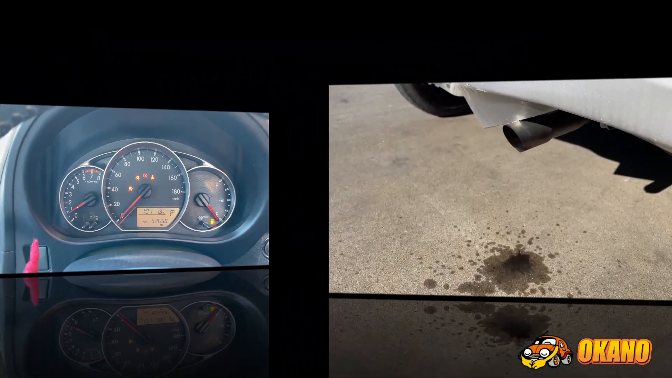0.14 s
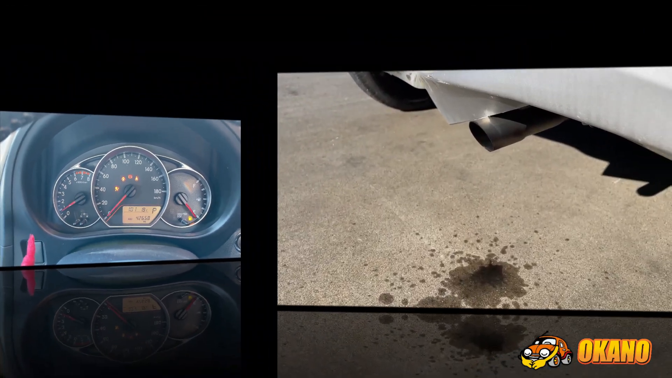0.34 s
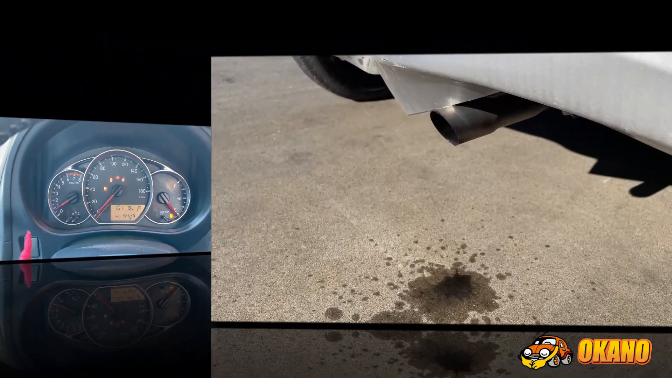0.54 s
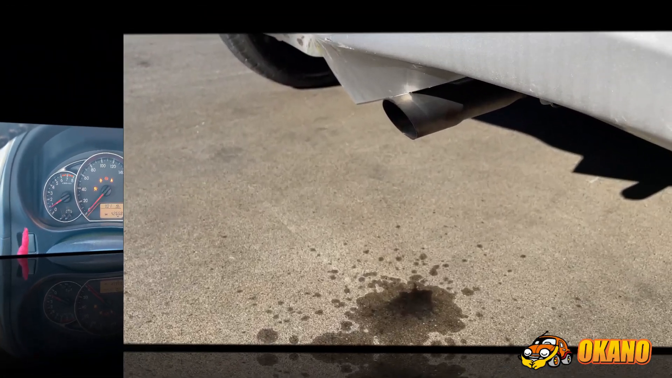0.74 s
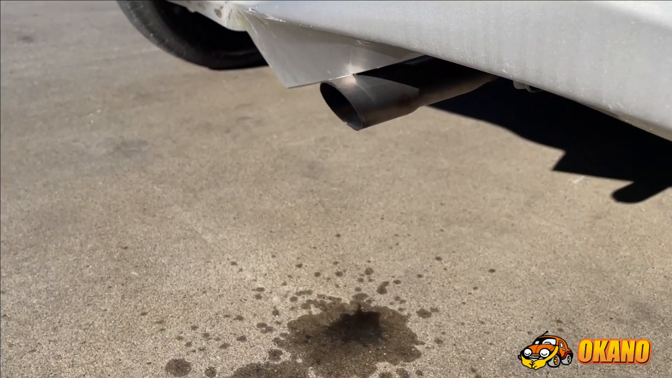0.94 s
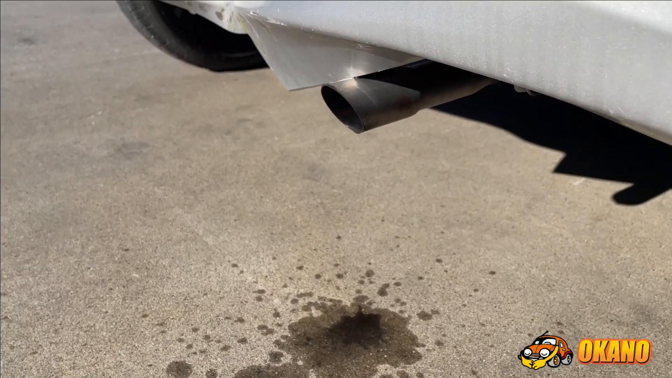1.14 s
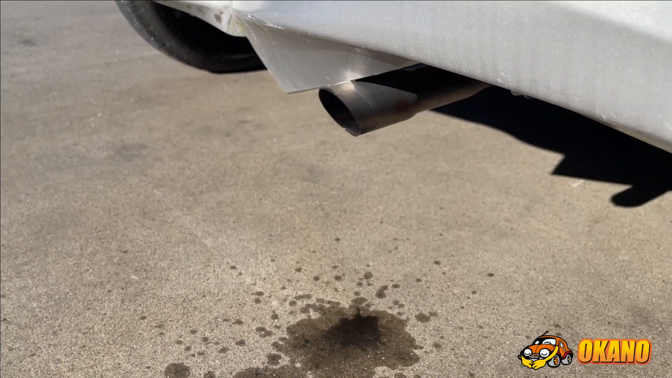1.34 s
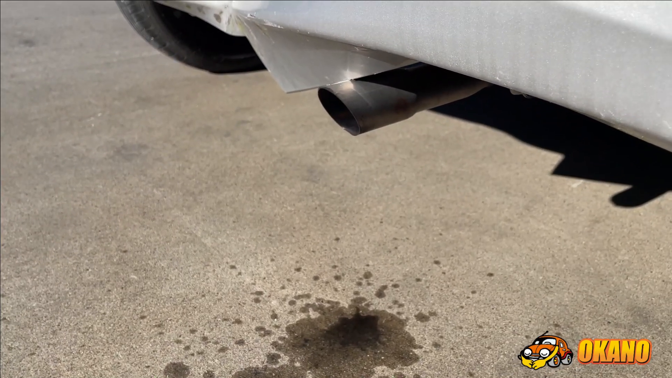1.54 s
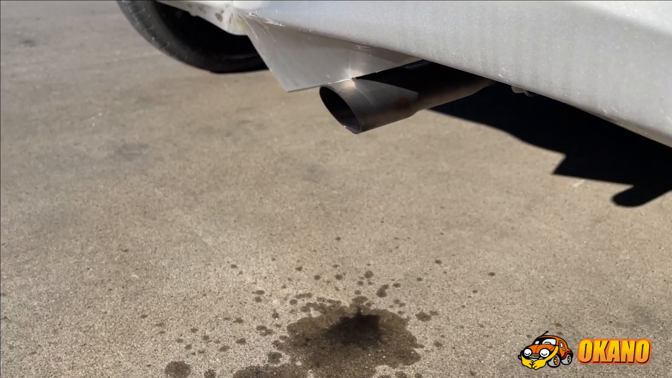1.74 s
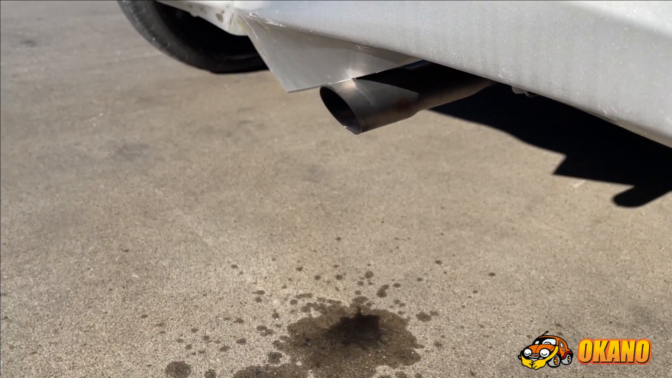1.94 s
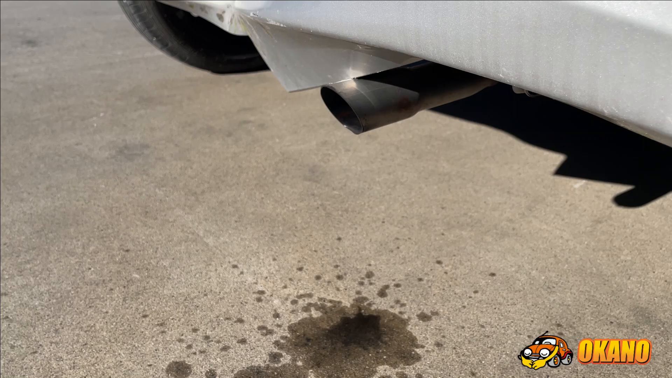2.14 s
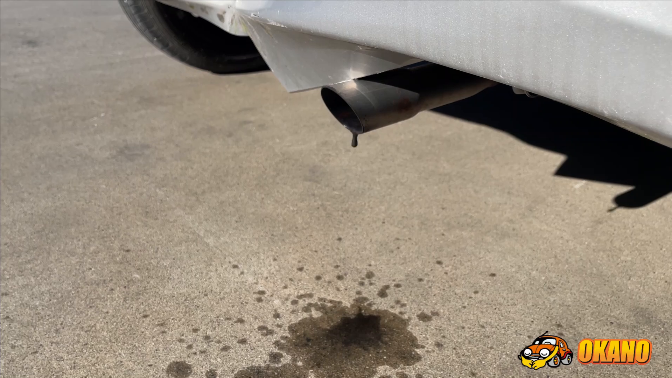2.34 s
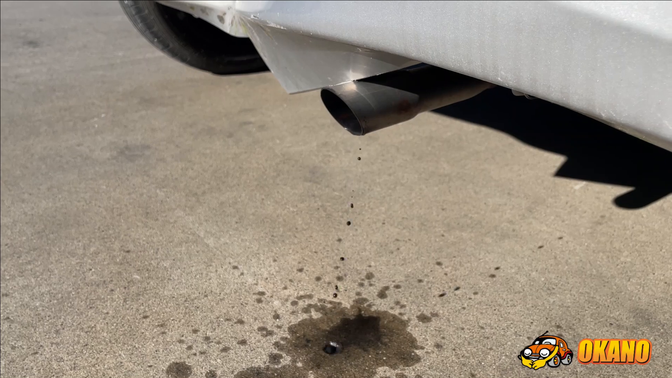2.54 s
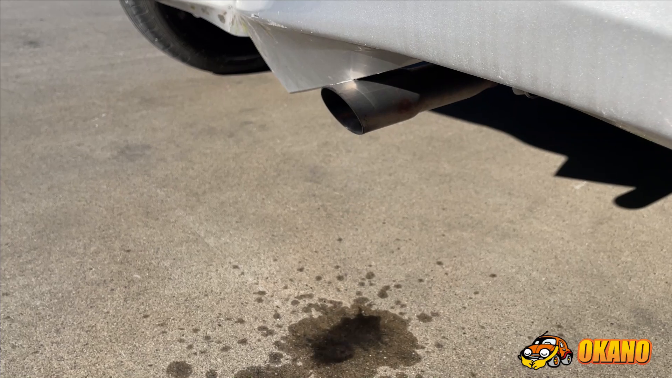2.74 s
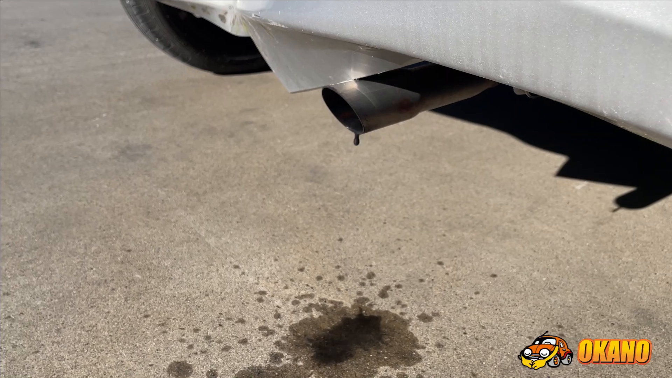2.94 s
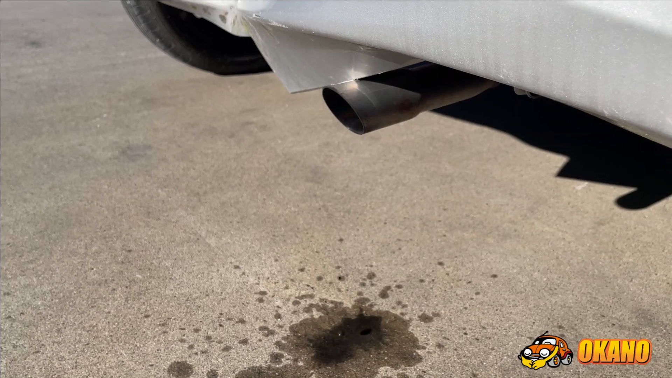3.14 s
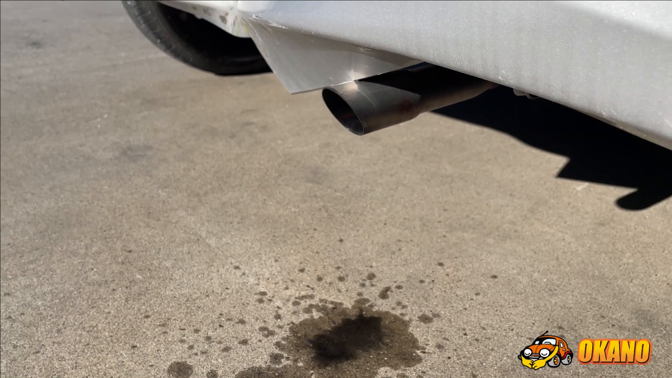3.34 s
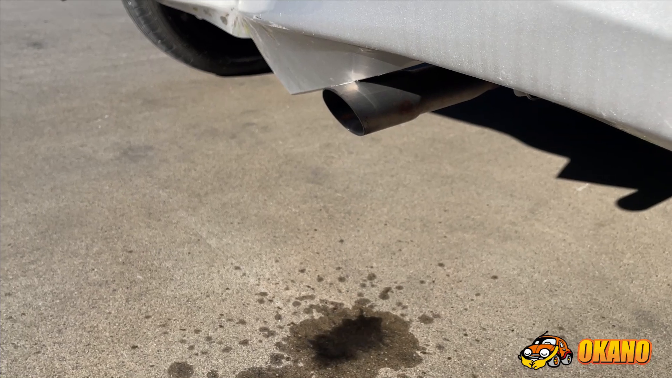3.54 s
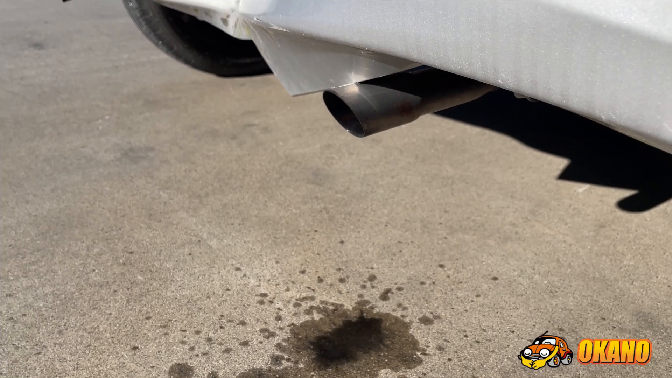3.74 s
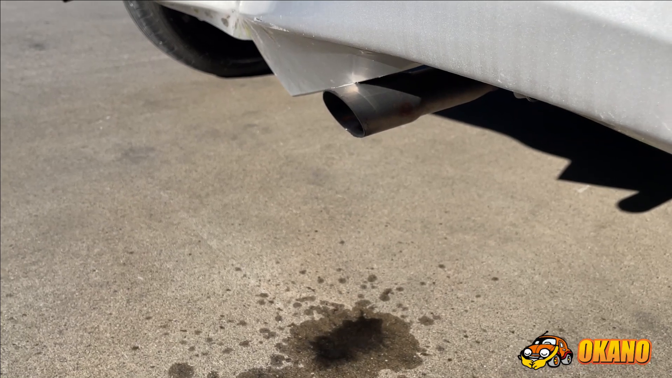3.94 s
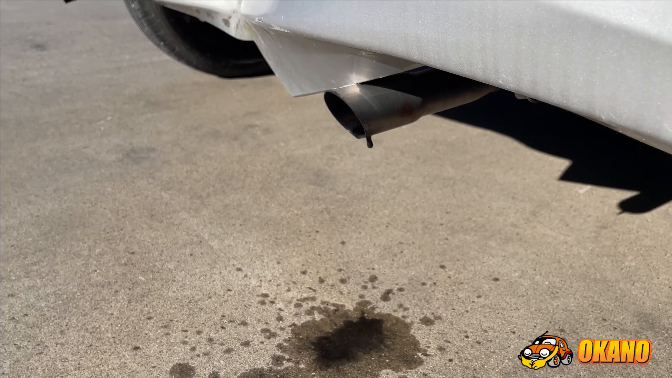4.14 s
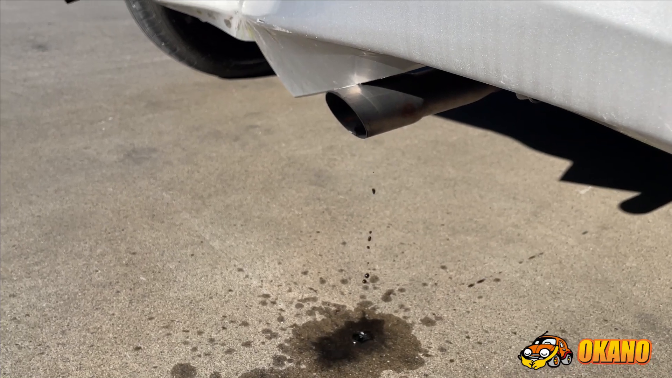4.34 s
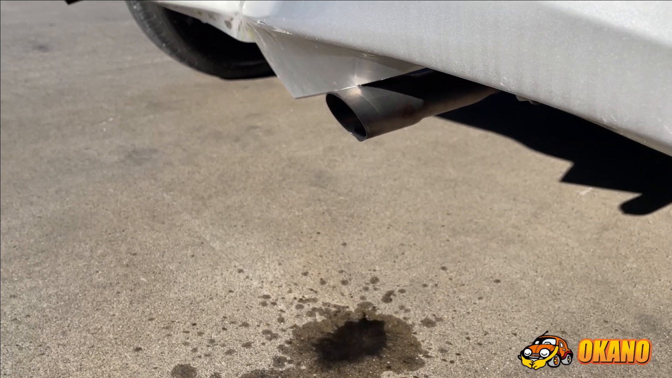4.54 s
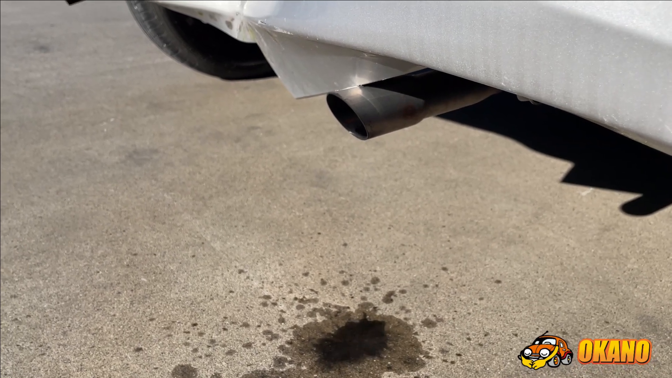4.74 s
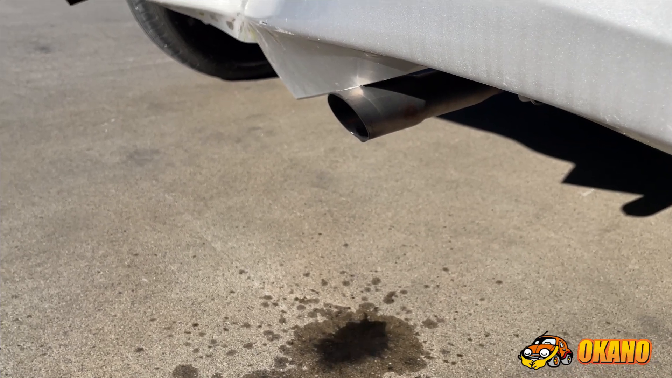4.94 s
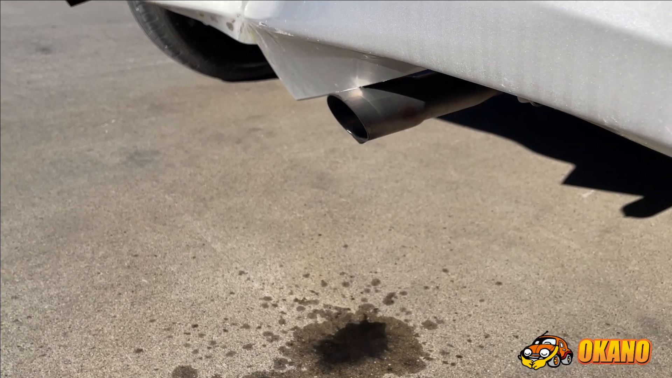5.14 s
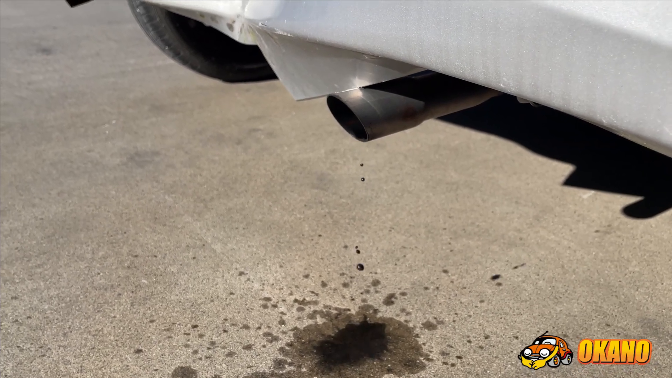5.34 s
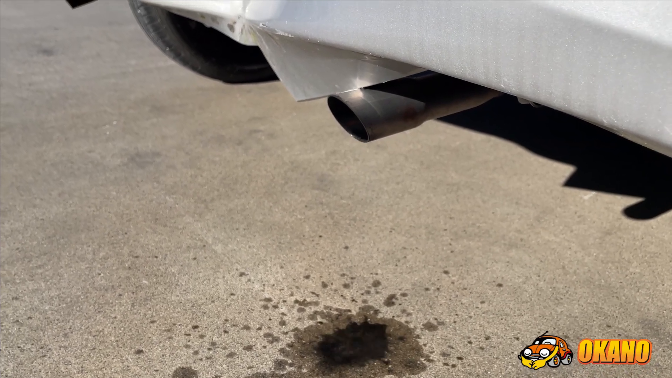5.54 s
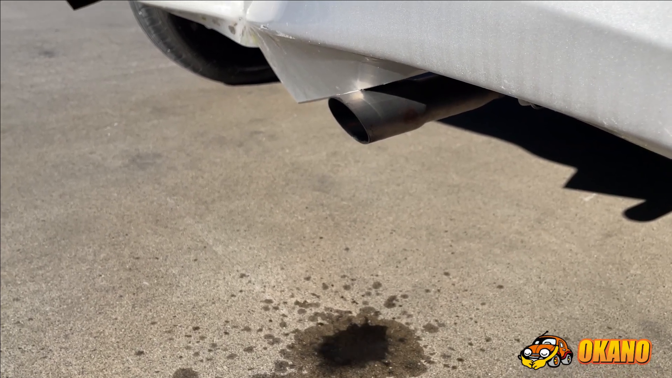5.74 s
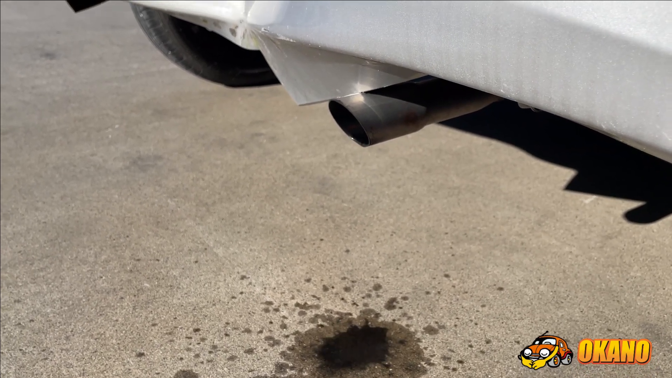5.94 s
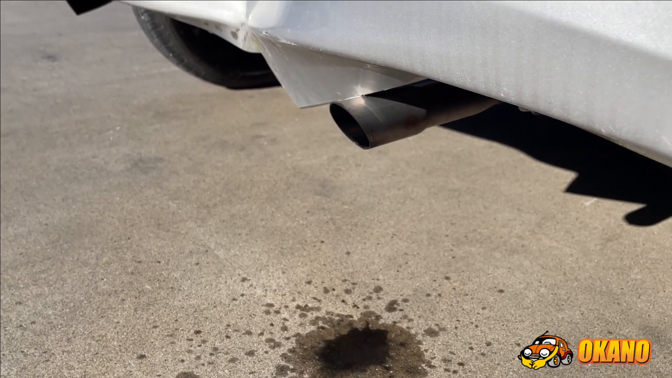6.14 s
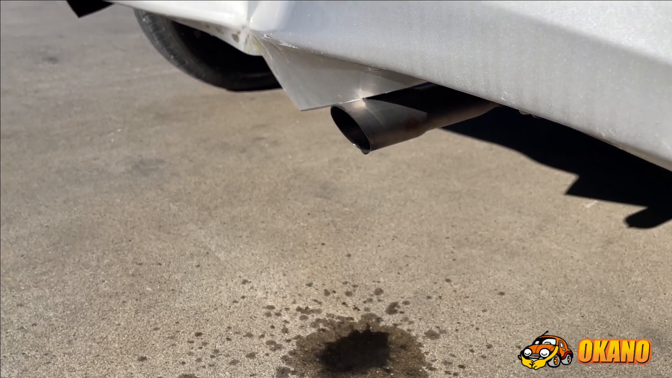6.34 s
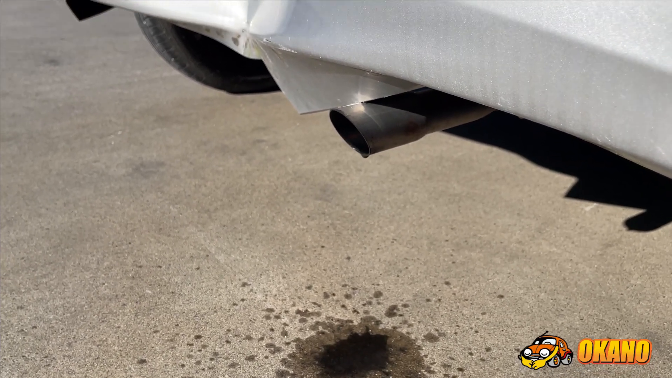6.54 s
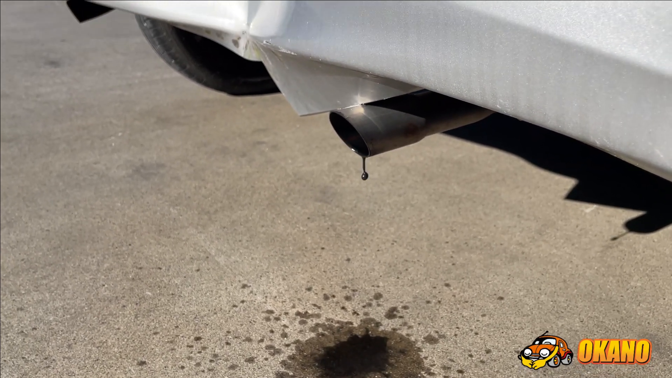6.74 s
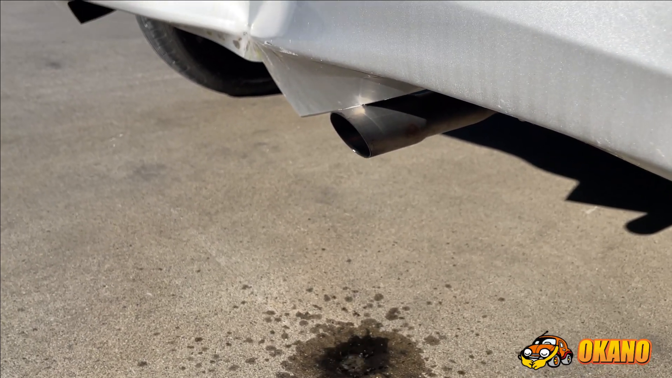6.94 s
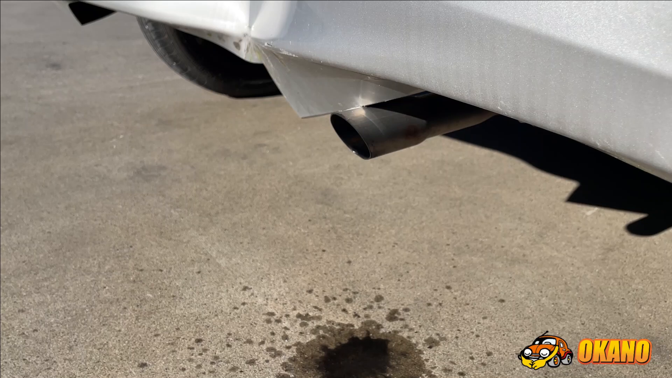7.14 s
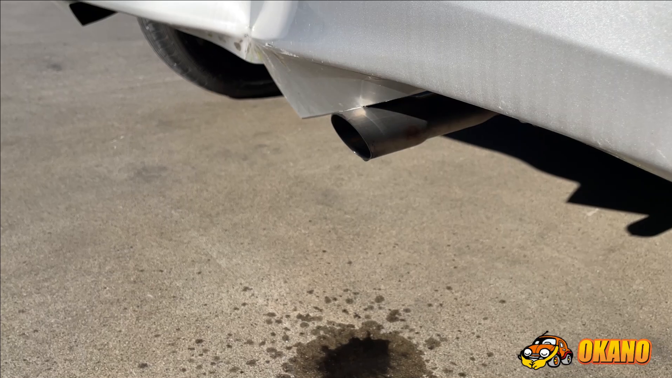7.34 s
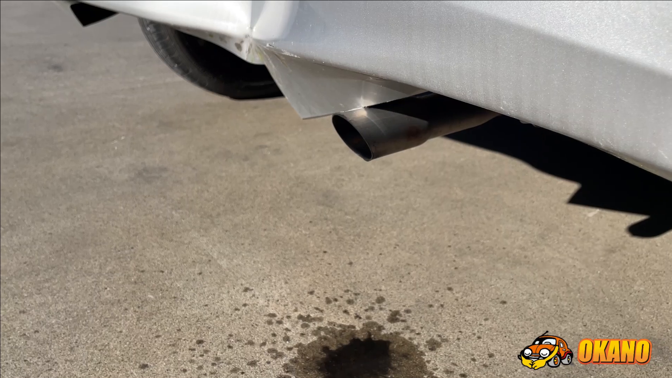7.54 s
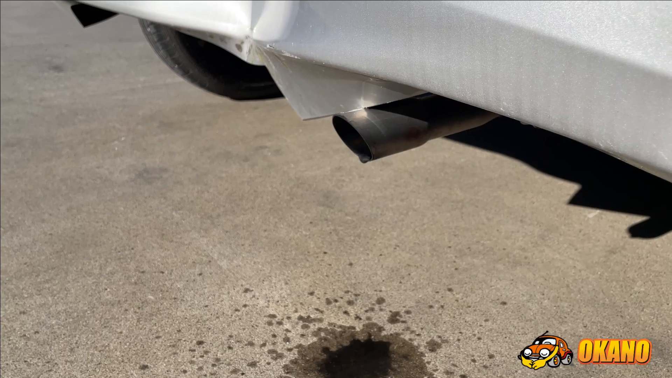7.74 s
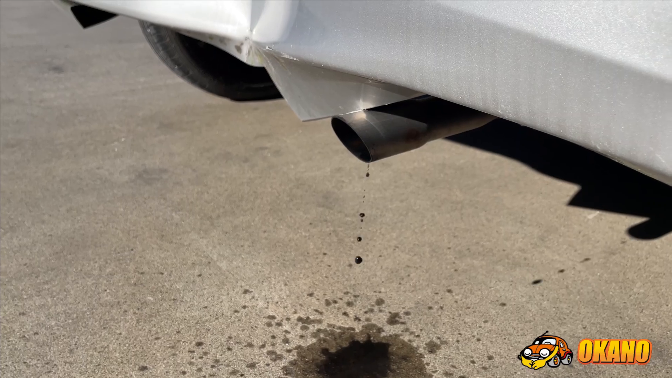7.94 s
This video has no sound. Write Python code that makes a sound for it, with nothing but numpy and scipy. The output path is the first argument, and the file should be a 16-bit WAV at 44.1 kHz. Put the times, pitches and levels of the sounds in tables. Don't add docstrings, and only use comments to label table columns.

```python
import sys
import numpy as np
from scipy import signal
from scipy.fft import rfft, irfft, next_fast_len
from scipy.io import wavfile
from scipy.ndimage import uniform_filter1d

SR = 44100
rng = np.random.default_rng(int(sys.argv[2]) if len(sys.argv) > 2 else 0)


def generate_wav(signal):
    frames = np.transpose(np.atleast_2d(signal))
    scaled = np.clip(frames, -1, 1) * 32767
    pcm = np.round(scaled).astype(np.int16)
    wavfile.write(sys.argv[1], SR, pcm)


def invert_db(x):
    u = np.asarray(x, float) / 20
    return 10 ** u


N = 356769

# (time [s], firing rate [1/s])
SPEED = [(0, 24.15), (1.1, 24.5), (1.7, 24.5), (1.9, 26.7), (2.03, 30.2), (2.5, 56.5), (2.78, 71.2),
         (3.1, 88.3), (3.31, 94.8), (3.66, 107.4), (4.18, 132.6), (4.53, 144.5), (4.85, 153.3), (5.18, 161),
         (5.7, 169.7), (6.1, 173.9), (6.55, 178.2), (7.3, 182.8)]
# (time [s], level [dB])
LOAD = [(0.06, -45), (0.75, -40), (1.83, -40.5), (2.03, -36), (2.32, -33.5), (2.36, -29), (2.85, -21.5),
        (3.32, -22), (3.39, -23.5), (4.11, -16.5), (4.13, -18), (4.24, -18), (4.67, -23), (5.05, -21.5),
        (5.4, -22), (7.55, -21), (7.91, -17.5), (8.09, -25.5)]
LOW_MULTIPLES = (1, 2, 3, 1.5, 4, 5)
# (level [dB], share of the load swing [0-1], gain off throttle [dB])
LOW_ORDERS = [(-1, 0.57, -5), (-14, 0.074, -3.5), (-12.5, 0.44, 3.5), (-37.5, 0.8, 15), (-17.5, 0.35, -6),
              (-18.5, 0.29, 8)]
# (firing rate [1/s], level [dB])
CRANK = [(24, -52), (60, -50), (100, -38), (125, -46), (150, -40), (160, -29), (169, -16.5), (176, -16.5),
         (183, -21.5)]
# (pitch [Hz], width [Hz], level [dB])
LONG_PIPE = [(56.2, 34, -11.5), (90, 18, -10.5), (156.3, 47, -12.5), (240, 55, 0.5), (313, 71, -7),
             (398, 39, -2), (447, 55, -4.5), (551, 47, -17)]
# multiples of the firing rate, then their extra level [dB]
FAVOURED_ORDERS = (2.5, 3.5, 4, 4.5, 5, 5.5, 6, 6.5, 7, 8, 9, 10, 11, 12, 13, 15, 17, 18.5, 21, 23)
FAVOURED_DB = (4, 4.5, 0.5, -1, 4, 0, 0.5, 9.5, -1.5, 3.5, 8, 6.5, 6, 3.5, 1, 4.5, -4, 1.5, 0.5, 3.5)
# multiples of the firing rate, then their extra level [dB]
IDLE_ORDERS = (4, 5, 6, 7, 9, 10, 11, 14)
IDLE_DB = (7.5, 21, 17, 7, 8, 2, -4.5, 8)
# (firing rate [1/s], puff noise against pulses [dB], crank-rate unevenness [dB],
# puff sharpness [per firing], firing scatter [dB])
CHARACTER = [(25, -2, -11, 1.9, 1.2), (50, -4, -7, 1.5, 1.3), (100, -5, -4, .8, .9),
             (143, -6.5, -4, .5, .5), (167, -8, -4, .4, .4)]
# (firing rate [1/s], silencer boom [dB], middle box [dB], tailpipe tip ring [dB])
BOOM = [(25.4, 14, 6, 13), (42, 12.5, 9, 12.5), (60.7, 16.5, 10, 12), (85, 1, 5, 5.5), (138, 3.5, 3.5, 5),
        (150.33, -5, -0.5, 4.5), (168.66, -1.5, 2, 0.5)]
# (pitch [Hz], width [Hz], level [dB])
SILENCER = [(100.3, 6.2, 6), (155, 52, -9), (239.6, 23.4, 13.5)]
BOX = [(323, 42, 4.4), (371, 24, 4), (447.6, 37, -1.5)]
TIP = [(802.6, 40, 1.2), (978, 115, 3.5), (1011.6, 113, 4.8), (1163.4, 32, 1.47)]
PIPE = [(605, 43, 7), (1255, 54, -10.5), (1417, 25, -3.5), (1636, 73, -3.5), (1790, 99, -9.5),
        (1860, 31, -6), (2045, 29.4, 4), (2226, 53, -4), (2483, 160, -4.5), (3056, 125, -3.5),
        (3300, 67, -0.5), (4070, 38, -6)]
# (pitch [Hz], level per Hz [dB])
HISS = [(1500, -30), (2600, -18), (3400, -7), (4000, -9), (5000, -12), (7000, -16), (9000, -19.5),
        (11500, -21), (13500, -24), (15500, -24.5)]
# (firing rate [1/s], level [dB])
MOUTH_BY_SPEED = [(24.5, -65.5), (45, -57), (70, -47), (135, -41.5), (180, -40.5)]
# (middle [s], peak [dB], half length [s])
GUSTS = [
    (1.06, -32, 0.41),
    (2.206, -29.5, 0.2),
    (3.556, -22.5, 0.11),
    (3.842, -22.5, .09),
    (4.33, -23.5, 0.15),
    (4.75, -37.5, 0.44),
    (7.687, -34, 0.15),
    (8.09, -27.5, 0.14),
]
# (middle [s], level [dB], half length [s])
FALTERS = [
    (3.26, -13, 0.043),
    (3.467, -5, 0.045),
    (3.904, -6, 0.056),
]
# (puff noise [dB], unevenness [dB], sharpness [per firing], scatter [dB])
LIFT_CHARACTER = (9.5, 3, .4, 1.5)
# (boom [dB], box [dB], tip [dB])
LIFT_BOOM_DB = (9, 4.5, 5.5)
# (pitch [Hz], phase [radians])
LEAD = [(0, 0), (340, .2), (600, -1.1), (1030, 0), (1460, -1.3), (2150, .5), (4900, .9), (6700, -1.3),
        (8250, -3.14), (11500, -6.28), (14800, -9.42), (16000, -10)]
# (pitch [Hz], level [dB])
LEAN = [(60, 1.5), (110, -3.5), (200, 1.5), (380, 2.5), (700, -3), (1290, 1), (2380, 1.5), (4400, 1.5),
        (8120, 2), (15000, -1.5)]
# (pitch [Hz], share [0-1])
ALIKE = [(60, 0.98), (250, 0.96), (600, 0.74), (1400, 0.57), (3000, 0.8), (5500, 0.58), (8000, 0.57),
         (12000, 0.34)]
# (begins [s], ends [s])
GAP_S = (.0146, .0545)
# (low [Hz], high [Hz])
LOST_MID = [(7750, 8850), (14050, 23000)]
LOST_SIDE = [(10650, 12400), (15750, 23000)]

FULL_LOAD_DB, CRANK_LIFT_DB, LINE_SWAY_DB = -20, 13, 1.11
FADE_IN_S, FADE_IN_DB, LEAD_IN_DB = 0.71, -6.5, -18.5
CALM_DB = -41.5
STEP = 4
LIFT_S, STUMBLE_RISE_S, STUMBLE_FALL_S, OVERRUN_SHARE = 7.5, 0.088, 0.3, 0.4
COAST_S, COAST_HZ_PER_S, COAST_EASE_S = 7.575, 93., 0.0402


def rms_one(x):
    return x / np.sqrt(np.mean(x ** 2) + 1e-20)


def in_time(rows):
    s, *columns = np.transpose(rows)
    return [np.interp(np.arange(N) / SR, s, c) for c in columns]


def at_hz(points, hz):
    f, v = np.transpose(points)
    return np.interp(np.log(hz + 1), np.log(f + 1), v)


def by_speed(rows, firing_hz):
    hz, *columns = np.transpose(rows)
    return np.array([np.interp(np.log(firing_hz), np.log(hz), c) for c in columns])


def drift(rate, count, size):
    knots = rng.standard_normal((count, 400))
    where = np.linspace(0, rate * N / SR, size)
    return np.array([np.interp(where, np.arange(400), k) for k in knots])


def bells(rows, heights):
    s = np.arange(N) / SR
    return sum(height * np.exp(-((s - mid) / half) ** 2) for (mid, _, half), height in zip(rows, heights))


def band(x, low_hz, high_hz):
    return signal.sosfilt(signal.butter(2, [low_hz, high_hz], "band", fs=SR, output="sos"), x)


def slow_rms(x, low_hz, high_hz):
    power = band(x, low_hz, high_hz) ** 2
    return np.sqrt(uniform_filter1d(uniform_filter1d(power, size=8000), size=8000) + 1e-12)


def coloured(x, spectrum):
    size = next_fast_len(N)
    gain = invert_db(at_hz(spectrum, np.fft.rfftfreq(size, 1 / SR)))
    return irfft(rfft(x, size) * gain, size)[:, :N]


def resonate(x, modes):
    out = 0
    for k, (hz, width_hz, db) in enumerate(modes):
        r = np.exp(-np.pi * width_hz / SR)
        a = [1, -2 * r * np.cos(2 * np.pi * hz / SR), r * r]
        b = [(1 - r * r) / 2, 0, (r * r - 1) / 2]
        out = out + (-1) ** k * invert_db(db) * signal.lfilter(b, a, x)
    return out


def speed():
    after = np.arange(N) / SR - COAST_S
    eased = (after + np.sqrt(after ** 2 + COAST_EASE_S ** 2)) / 2
    return in_time(SPEED)[0] - COAST_HZ_PER_S * eased * (after > -.3)


def long_pipe_db(hz):
    gains = []
    for mid_hz, width_hz, db in LONG_PIPE:
        damping = (width_hz * hz) ** 2
        gains.append(invert_db(db) * damping / ((hz ** 2 - mid_hz ** 2) ** 2 + damping))
    return 10 * np.log10(np.sum(np.square(gains), axis=0))


def low_levels(firing_hz, load_db, fade_db):
    top_s = LIFT_S + STUMBLE_RISE_S
    overrun, = in_time([(top_s, 0), (top_s + STUMBLE_FALL_S, 1)])
    levels = []
    for k, (db, share, lift_db) in zip(LOW_MULTIPLES, LOW_ORDERS):
        swing_db = share * (load_db - FULL_LOAD_DB)
        levels.append(db + long_pipe_db(k * firing_hz) + swing_db + lift_db * overrun)
    levels[0] = levels[0] + falter_db()
    crank = by_speed(CRANK, firing_hz)[0] + CRANK_LIFT_DB * overrun
    sway = LINE_SWAY_DB * drift(6, count=7, size=N) * np.c_[[.5, 2, 2, 2, 2, 2, 1]]
    return np.array(levels + [crank]) + fade_db + sway


def drone(turns, levels_db):
    lines = zip((*LOW_MULTIPLES, .5), levels_db, rng.random(7))
    return sum(np.sqrt(2) * invert_db(db) * np.sin(2 * np.pi * (k * turns + start)) for k, db, start in lines)


def pulses(turns, firing_hz, uneven_db):
    orders = []
    for quarter in range(3, 560):
        dense_enough = quarter < 30 or quarter % 4 == 0 or quarter % 2 == 0 and quarter < 100
        if quarter not in (4, 8, 12) and dense_enough:
            orders.append(quarter / 4)
    turns, firing_hz, uneven_db = turns[::STEP], firing_hz[::STEP], uneven_db[::STEP]
    wander = np.clip(2.5 * drift(4.5, count=len(orders), size=len(turns) // 16 + 1), -8, 5)
    idle = np.clip((48 - firing_hz) / 18, 0, 1)
    favoured, hum = dict(zip(FAVOURED_ORDERS, FAVOURED_DB)), dict(zip(IDLE_ORDERS, IDLE_DB))
    out = np.zeros(len(turns))
    for k, sway, start in zip(orders, wander, rng.random(len(orders))):
        top_hz = 4600 if k < 26 else 3400
        on = np.flatnonzero(k * firing_hz < top_hz)
        fast = np.clip(firing_hz[on] / 90 - k / 30 - .3, .3, 1)
        db = fast * (favoured.get(k, 0) + sway[on // 16]) + idle[on] * hum.get(k, 0)
        db = db + (k % 1 > 0) * uneven_db[on] - 8.3 * (k % .5 > 0)
        spread = 1 if k % 1 else min(k / 200 + (k > 52) * .25, .55)
        fade = np.minimum((top_hz - k * firing_hz[on]) / 400, 1)
        out[on] += invert_db(db) * fade * np.cos(2 * np.pi * (k * turns[on] + spread * start))
    return signal.resample_poly(out, STEP, 1)[:N]


def puffs(turns, sharp):
    gate = np.exp(-sharp * (turns % 1))
    return gate / np.sqrt(uniform_filter1d(gate ** 2, size=4000))


def exhaust_ringing(beat, turns, sharp, scatter_db, puff_db, pipe_db, boom_levels_db):
    boom_db, box_db, tip_db = boom_levels_db
    strength = invert_db(scatter_db * rng.standard_normal(1200)[(turns + 1.3).astype(int)])
    beats = strength * np.array([beat, np.roll(beat, 97), -np.roll(beat, 151)])
    gas = strength * invert_db(puff_db + 9) * rng.standard_normal((3, N)) * puffs(turns, sharp)
    flow = invert_db(puff_db + 9) * rng.standard_normal((3, N))
    boom = invert_db(boom_db) * resonate(beats + invert_db(-8) * gas, SILENCER)
    box = invert_db(box_db) * resonate(beats + invert_db(-1.5) * gas, BOX)
    tip_delay = round(0.005015 * SR)
    tip = invert_db(tip_db) * np.roll(resonate(beats + gas, TIP), tip_delay, axis=1)
    pipe = resonate(beats + gas, PIPE) + invert_db(1.5) * band(flow, 350, 1560)
    tube = tip + signal.sosfilt(signal.butter(2, 4300, fs=SR, output="sos"), pipe)
    return invert_db(pipe_db) * (box - boom + tube) / slow_rms(tube[0], 650, 4100)


def mouth_hiss(turns, sharp, hiss_db):
    flutter = invert_db(0.6 * drift(9, count=1, size=N) + .5 * drift(30, count=1, size=N))
    jet = coloured(rng.standard_normal((3, N)) * puffs(turns, .2 * sharp) * flutter, HISS)
    return invert_db(hiss_db + 7.0) * jet / slow_rms(jet[0], 3460, 11600)


def gusts():
    return invert_db(CALM_DB) + bells(GUSTS, [invert_db(db) for _, db, _ in GUSTS])


def buffet():
    lumps = invert_db(5.5 * drift(12, count=3, size=N)) * [[1], [1.7], [1.7]]
    rumble = band(band(rng.standard_normal((3, N)), 37.4, 118), 45.0, 345)
    return gusts() * rms_one(rumble) * lumps


def falter_db():
    return bells(FALTERS, [db for _, db, _ in FALTERS])


def lift_off():
    top_s = LIFT_S + STUMBLE_RISE_S
    return in_time([(LIFT_S, 0), (top_s, 1), (top_s + STUMBLE_FALL_S, OVERRUN_SHARE)])[0]


def ports(common, left, right):
    size = next_fast_len(N)
    hz = np.fft.rfftfreq(size, 1 / SR)
    alike = np.clip(at_hz(ALIKE, hz), 0, 1)
    half = np.exp(.5j * at_hz(LEAD, hz))
    lean = invert_db(at_hz(LEAN, hz) / 2)
    shared = np.sqrt(alike) * rfft(common, size)
    own = np.sqrt(1 - alike) * rfft([left, right], size)
    return irfft([lean * (shared * half + own[0]), (shared / half + own[1]) / lean], size)[:, :N]


def scene():
    firing_hz, (pipe_db,), lift = speed(), in_time(LOAD), lift_off()
    fade_db, = in_time([(0, FADE_IN_DB), (FADE_IN_S, 0)])
    turns = np.cumsum(firing_hz) / SR - .09
    character = by_speed(CHARACTER, firing_hz) + np.outer(LIFT_CHARACTER, lift)
    puff_db, uneven_db, sharp, scatter_db = character
    boom_levels_db = by_speed(BOOM, firing_hz) + np.outer(LIFT_BOOM_DB, lift)
    hiss_db = by_speed(MOUTH_BY_SPEED, firing_hz)[0] + fade_db

    low = drone(turns, low_levels(firing_hz, pipe_db, fade_db))
    beat = pulses(turns, firing_hz, uneven_db)
    beat = beat / slow_rms(beat, 500, 3000)
    ringing = exhaust_ringing(beat, turns, sharp, scatter_db, puff_db, pipe_db, boom_levels_db)
    hiss = mouth_hiss(turns, sharp, hiss_db)
    lows = [low, np.roll(low, 60), np.roll(low, -60)]
    return ports(*(ringing + hiss + buffet() + lows))


def without(x, bands):
    size = next_fast_len(N)
    spectrum, hz = rfft(x, size), np.fft.rfftfreq(size, 1 / SR)
    for low, high in bands:
        spectrum[(hz > low) & (hz < high)] *= .003
    return irfft(spectrum, size)[:N]


def roll_off(x):
    return signal.sosfilt(signal.butter(12, 15730, fs=SR, output="sos"), x)


def record(dry):
    s = np.arange(N) / SR
    gate = np.where(s < GAP_S[0], invert_db(LEAD_IN_DB), s > GAP_S[1])
    bass_cut = signal.sosfilt(signal.butter(4, 34, "high", fs=SR, output="sos"), dry)
    left, right = np.tanh(bass_cut / 1.19) * 1.382
    mid = without(left + right, LOST_MID) / 2
    side = without(left - right, LOST_SIDE) / 2
    return roll_off(gate * np.array([mid + side, mid - side]))


dry = scene()
out = record(dry)
generate_wav(out)
```